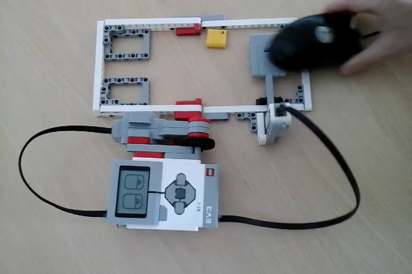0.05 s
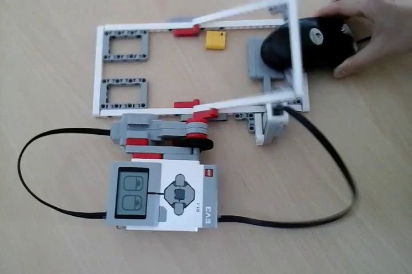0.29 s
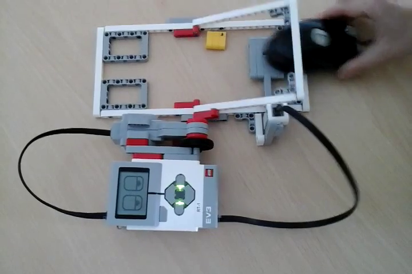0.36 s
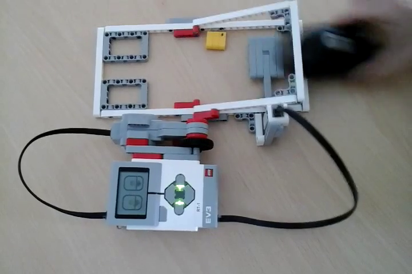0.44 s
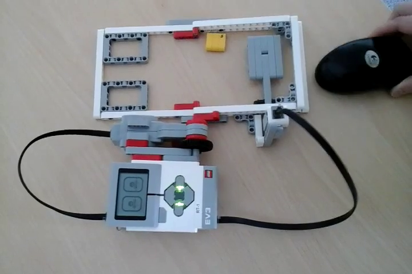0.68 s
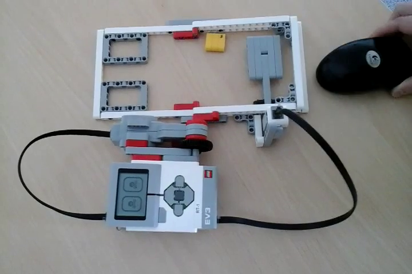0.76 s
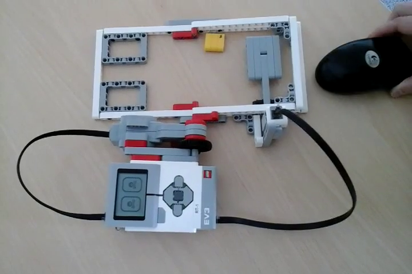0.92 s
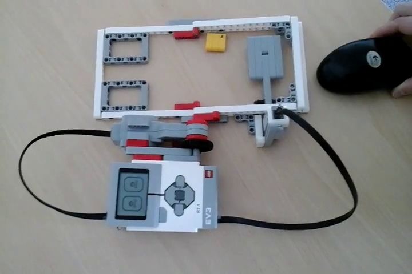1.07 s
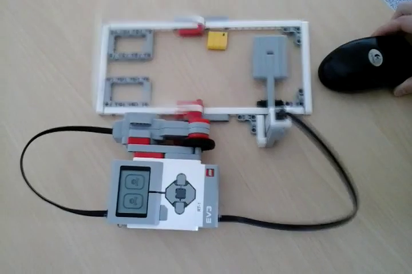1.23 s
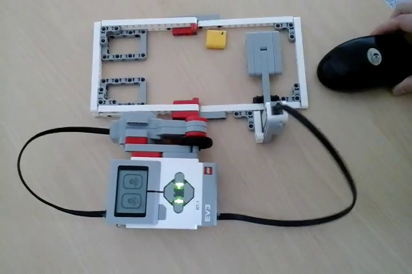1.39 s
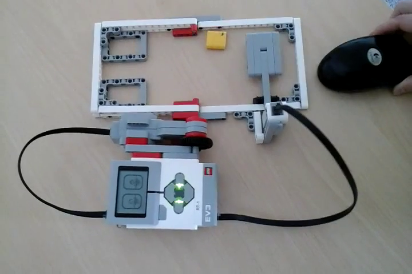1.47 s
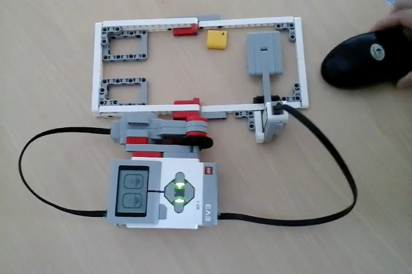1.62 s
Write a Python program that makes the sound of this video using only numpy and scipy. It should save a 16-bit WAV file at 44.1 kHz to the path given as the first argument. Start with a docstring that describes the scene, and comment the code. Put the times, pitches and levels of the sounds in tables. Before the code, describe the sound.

Two sharp plastic snaps with brief rattles, as a small geared motor whirs in spurts.

```python
"""Toy brick trap on a table

A small geared motor twice swings a plastic arm over; it slaps its frame, bounces and rattles. In between,
the motor winds back in three short spurts and the bait, a computer mouse, is dragged over the table.
A bare room, a close pair of microphones: the right one rings near 5 kHz, and the slaps overload them."""
import sys
import numpy as np
from scipy import signal
from scipy.fft import rfft, irfft
from scipy.io import wavfile
from scipy.ndimage import uniform_filter1d

SR = 44100
rng = np.random.default_rng(int(sys.argv[2]) if len(sys.argv) > 2 else 0)


def master(y):
    """Save y as 16-bit WAV."""
    cut = np.clip(np.atleast_2d(y).T, -1, 1)
    pcm = np.round(cut * 32767)  # scale
    wavfile.write(sys.argv[1], SR, pcm.astype(np.int16))


N = 74970
T = np.arange(N) / SR
HZ = np.maximum(np.fft.rfftfreq(2 * N, 1 / SR), 1)

# the arm's slaps and bounces; clicks of the trigger and of gears taking up slack
# (time [s], level [dB], body relative to that level [dB], contact ring [Hz])
ARM_SLAPS = [(.2582, 2.5, 1.5, 4960), (.2632, -1.5, 4.5, 5600), (.268, 2, -7.5, 4770),
             (.2715, -1.5, -8, 4900), (.284, -4.5, -2, 5050), (.2875, -11.5, 8, 5200),
             (.296, -12, -24, 5340), (.3132, -4.5, -9, 5350), (.3157, -5.5, -9.5, 5250),
             (.3445, -14.5, -5, 5140), (1.2898, 4, -11.5, 5480), (1.2932, 4.5, -1.5, 5350),
             (1.298, 4.5, -10, 5430), (1.304, -1.5, -13, 5470), (1.308, -8, -16, 5570),
             (1.3118, -8, -8, 5800), (1.3145, -6, -12, 5430), (1.3205, -8, -2.5, 5240),
             (1.3345, -7.5, -16, 5200), (1.383, -9, -4.5, 5600), (1.3865, -12.5, -0.5, 5400)]
SLACK_CLICKS = [(.0395, -31, 4, 4730), (.0425, -39.5, 8.5, 5400), (.087, -38.5, -5, 5260),
                (.5182, -15.5, -12, 5160), (.5215, -15.5, -1, 5230), (.597, -26, 2, 5400),
                (1.081, -34.5, -12, 5570)]
# modes of the frame (frequency [Hz], level [dB], t60 [s])
FRAME_MODES = [(474, 1, 0.039), (849, 1, 0.15), (968, -2.5, 0.054), (1280, -2.5, 0.11), (1813, -1, 0.045),
               (2279, 3.5, 0.076), (2483, -5.5, 0.078), (2677, 2, 0.07), (3008, -5, 0.079),
               (3780, -1, 0.074), (4576, 3, .08)]
# the table's low modes, rocking the microphones against each other
# (frequency [Hz], level [dB], t60 [s], rocking [0-1])
TABLE_MODES = [(33.8, -18, 0.018, 0.74), (106.6, -8, 0.19, 0.45), (222, -3, 0.1, 0.69),
               (327, -12, 0.019, 0.8)]
# spectra of the table's knock and the plastic's crack (frequency [Hz], level [dB])
KNOCK_SPECTRUM = [(30, -60), (100, -22), (260, 2.5), (600, -1.5), (1000, 1), (2500, -2), (4000, 3.5),
                  (8000, -12.5), (16000, -3.5)]
CRACK_SPECTRUM = [(100, -16), (1000, -11.5), (2500, -1.5), (4500, -2.5), (7000, -9.5), (10000, 4),
                  (14000, -12.5), (16000, -7)]
# gear loudness, swinging and winding back, one curve per run (time [s], level [dB])
SWING_RUNS = [
    [(.098, -37), (.108, -31), (.131, -27), (.156, -23.5), (.198, -27), (.222, -17), (.243, -22.5),
     (.257, -18.5)],
    [(1.08, -38.5), (1.104, -35), (1.11, -25.5), (1.138, -22), (1.17, -25.5), (1.198, -31), (1.24, -27),
     (1.256, -22.5), (1.288, -29)],
]
REWIND_RUNS = [
    [(.52, -21), (.533, -20), (.565, -18), (.575, -23.5), (.579, -14), (.586, -18.5), (.606, -19),
     (.622, -37)],
    [(.724, -27), (.7325, -18.5), (.75, -18.5), (.768, -18), (.782, -21), (.8, -32)],
    [(.935, -44), (.972, -37), (.985, -24.5), (1.002, -27), (1.022, -34), (1.036, -47)],
]
# the gearbox's colour in each direction (frequency [Hz], level [dB])
SWING_SPECTRUM = [(100, -30), (300, -10.5), (600, -29), (1400, -20), (2300, -16), (3100, -3), (4000, -7),
                  (5000, -3.5), (5900, -7), (7200, -19), (10000, -14.5), (15000, -27.5)]
REWIND_SPECTRUM = [(100, -28), (400, -19), (650, -23.5), (1250, -6.5), (2100, -18.5), (2900, -11.5),
                   (3700, -11), (4750, -4), (5600, -9.5), (7200, -22), (10000, -12.5), (15000, -34)]
# its two resonances shift with the load, one row per run
# (upper frequency [Hz], upper level [dB], lower frequency [Hz], lower width [Hz], lower level [dB])
SWING_RESONANCES = [(5030, 13, 3000, 620, -1), (5300, 8.5, 3270, 240, 4)]
REWIND_RESONANCES = [(4660, 13.4, 2800, 330, 3), (4730, 15.8, 2980, 460, 9.9), (4890, 14, 2720, 120, 20.3)]
# motor whine during the second swing (time [s], level [dB])
WHINE_LEVELS = [(1.115, -86), (1.135, -72), (1.165, -42), (1.19, -68), (1.225, -48), (1.265, -48),
                (1.285, -60)]
# the bait sliding over the table (time [s], level [dB])
DRAG_LEVELS = [(.49, -45), (.535, -32.5), (.62, -34), (.68, -38), (.74, -42), (.8, -43)]
# spectra of that sliding, the room's echo and the room tone (frequency [Hz], level [dB])
DRAG_SPECTRUM = [(50, -16), (150, -0.5), (480, 5), (900, -14), (1450, 3), (2000, -5), (4000, -7),
                 (10000, -65)]
ECHO_SPECTRUM = [(40, -19), (150, -4), (500, -2.5), (1500, -2), (2500, -3.5), (5000, -4), (8000, -6),
                 (14000, -7)]
ROOM_TONE_SPECTRUM = [(25, -16), (90, -13), (180, -4), (450, -8.5), (1500, -13.5), (5300, -29.5),
                      (9000, -30), (14000, -33)]
# the room's decay, held to at least 1 ms in use (frequency [Hz], t60 [s])
ECHO_DECAY = [(100, 0.35), (300, 0.93), (800, 0.86), (1800, 1.35), (5000, 0.89), (8000, 0.5),
              (14000, -0.17)]
# response of each microphone, and of what the two have in common (frequency [Hz], gain [dB])
LEFT_RESPONSE = [(100, 1), (1100, 3), (2300, -1), (3500, -2.5), (5000, -5), (7000, 4), (10000, -3.5),
                 (15000, -4)]
RIGHT_RESPONSE = [(100, 2), (1100, -0.5), (2300, 4), (4000, -1), (4900, 6), (6000, 7), (7500, 6),
                  (15000, -22)]
MID_RESPONSE = [(30, 1), (70, -5.5), (140, -9), (300, -11), (600, -3.5), (1200, -1.5), (15000, 1.5)]

FRAME_DB, KNOCK_DB, CRACK_DB, RING_DB, TICK_DB, THUD_DB = -21, -5, -3, -3.5, 1, -25
KNOCK_T60_S, CRACK_T60_S, RING_T60_S, TICK_T60_S = .043, .024, .02, .0084
SOFT_DULLING = .64  # extra dB of crack lost per dB of weaker contact
TOOTH_JITTER, TOOTH_SCATTER_DB, TOOTH_SCRAPE_S = .2, 1.5, .003
RUB_DB, SHAFT_HZ, SHAFT_DB = -2, 120, 1


def strikes(contacts, frame_modes):
    """Each contact cracks, rings the struck brick and any frame modes, and knocks and shakes the table."""
    out = np.zeros((2, N))
    knock, crack = noise(KNOCK_SPECTRUM), noise(CRACK_SPECTRUM)
    thud = sum(undb(level) * np.sin(2 * np.pi * hz * T) * fade(T, t60) * np.array([[1], [1 - 2 * rock]])
               for hz, level, t60, rock in TABLE_MODES)
    for start, db, body_db, ring_hz in contacts:
        first = int(start * SR)
        t = T[:min(N - first, N // 5)]
        span = slice(first, first + len(t))
        ring = unit(resonate(rng.standard_normal((2, N // 5)), ring_hz, width_hz=880))[:, :len(t)]
        phases = rng.uniform(0, 2 * np.pi, (len(frame_modes), 2, 1))
        detunes = 1 + .002 * rng.standard_normal(len(frame_modes))
        frame = sum(undb(level) * np.sin(2 * np.pi * hz * detune * t + phase) * fade(t, t60)
                    for (hz, level, t60), phase, detune in zip(frame_modes, phases, detunes))
        body = undb(FRAME_DB) * frame + undb(KNOCK_DB) * knock[:, span] * fade(t, KNOCK_T60_S)
        edge = undb(CRACK_DB + SOFT_DULLING * db) * crack[:, span] * fade(t, CRACK_T60_S)
        edge += undb(RING_DB) * ring * fade(t, RING_T60_S)
        edge *= 1 + undb(TICK_DB) * fade(t, TICK_T60_S)  # the first instant stands out
        out[:, span] += undb(db) * (edge + undb(body_db) * body + undb(THUD_DB) * thud[:, :len(t)])
    return out


def gears(runs, resonances, spectrum, teeth_hz, db):
    """Plastic teeth scrape in an uneven train and ring the gearbox: (close up, sent to the room)."""
    timing, force = rng.standard_normal((N // 40, 2)).T
    onsets = ((np.arange(len(timing)) + TOOTH_JITTER * timing) / teeth_hz * SR).astype(int)
    inside = (onsets >= 0) & (onsets < N)
    teeth = np.bincount(onsets[inside], undb(TOOTH_SCATTER_DB * np.clip(force[inside], -2, 2)), N)
    pressure = unit(np.convolve(teeth, np.hanning(int(TOOTH_SCRAPE_S * SR)), "same")) + undb(RUB_DB)
    shaft_swell = undb(SHAFT_DB * np.sin(2 * np.pi * SHAFT_HZ * T))
    scrape = pressure * rng.standard_normal((2, N)) * shaft_swell
    scrape = scrape + undb(-15.5) * scrape[::-1]  # spill between the microphones
    rattle = colour(scrape, spectrum)
    near = far = 0
    for run, (upper_hz, upper_db, lower_hz, lower_width_hz, lower_db) in zip(runs, resonances):
        upper = undb(upper_db) * resonate(rattle, upper_hz, width_hz=320)
        lower = undb(lower_db) * resonate(rattle, lower_hz, lower_width_hz)
        ringing = (upper + lower) / 2
        gain = swell(run) * undb(db) / np.std(rattle + ringing)
        near += gain * (rattle + ringing)
        far += gain * (rattle + undb(-32) * ringing)  # little of the ring reaches the room
    return np.array([near, far])


def motor_whine(pitch_hz=1835, wobble_hz=14):
    """A thin, slightly unsteady tone from the motor at full speed."""
    hz = pitch_hz + wobble_hz * unit(uniform_filter1d(rng.standard_normal(N), size=400))
    return np.sin(2 * np.pi * np.cumsum(hz) / SR) * swell(WHINE_LEVELS)


def bait_drag():
    """The bait rubs over the tabletop with a brief, dull hiss."""
    return noise(DRAG_SPECTRUM) * swell(DRAG_LEVELS)


def room_echo(x, build_s=.008):
    """The bare room's diffuse echo builds up and dies away, the top octaves first."""
    octaves_hz = 62.5 * 2 ** np.arange(9)
    spectrum = rfft(rng.standard_normal((2, N)), 2 * N)
    tail = 0
    for hz, share in zip(octaves_hz, np.eye(len(octaves_hz))):
        envelope = fade(T, along(ECHO_DECAY, hz)) * (1 - np.exp(-T / build_s))
        band = irfft(spectrum * np.interp(np.log(HZ), np.log(octaves_hz), share))[:, :N]
        tail += band * envelope / np.sqrt(np.sum(envelope ** 2))
    return signal.fftconvolve(x, colour(tail, ECHO_SPECTRUM), axes=1)[:, :N]


def room_tone():
    """Faint, steady noise behind everything."""
    return undb(-50) * noise(ROOM_TONE_SPECTRUM)


def undb(db):
    """Decibels to gain."""
    return 10 ** (np.asarray(db) / 20)


def unit(x):
    """Scale to an rms of one."""
    return x / np.sqrt(np.mean(x ** 2))


def along(points, hz):
    """Read a table on a log-frequency axis."""
    frequencies, values = np.array(points).T
    return np.interp(np.log(hz), np.log(frequencies), values)


def colour(x, points):
    """Minimum-phase filter through the points (frequency [Hz], gain [dB])."""
    cepstrum = irfft(np.log(undb(along(points, HZ))))
    cepstrum[1:N] *= 2
    cepstrum[N + 1:] = 0
    return irfft(rfft(x, 2 * N) * np.exp(rfft(cepstrum)))[..., :N]


def noise(points):
    """Coloured noise, different at the two microphones."""
    return unit(colour(rng.standard_normal((2, N)), points))


def resonate(x, hz, width_hz):
    """One resonance, gain 1 at its centre."""
    return signal.lfilter(*signal.iirpeak(hz, hz / width_hz, fs=SR), x)


def fade(t, t60):
    """Exponential decay by 60 dB in t60 seconds, 1 ms at the shortest."""
    return np.exp(-np.log(1000) * t / max(t60, .001))


def swell(points):
    """Gain along a curve (time [s], level [dB]), silent outside it."""
    return undb(np.interp(T, *np.array(points).T, left=-np.inf, right=-np.inf))


def pan(db):
    """Gains of the pair for a level difference, left minus right."""
    return undb(np.array([[db], [-db]]) / 2)


def scene():
    """The trap close by and to the right, the bait on the table, the room around them."""
    slaps = strikes(ARM_SLAPS, FRAME_MODES)
    clicks = strikes(SLACK_CLICKS, frame_modes=[])
    swings = gears(SWING_RUNS, SWING_RESONANCES, SWING_SPECTRUM, teeth_hz=500.3, db=-5) + motor_whine()
    rewinds = gears(REWIND_RUNS, REWIND_RESONANCES, REWIND_SPECTRUM, teeth_hz=355.2, db=-5.5)
    motor_near, motor_far = swings + rewinds
    echo = room_echo(undb(-6.5) * slaps + motor_far + clicks)
    direct = slaps * pan(db=-4.5) + clicks * pan(db=-7) + motor_near * pan(db=-6.5)
    return direct + bait_drag() + echo + room_tone()


def record(dry):
    """Two unlike microphones, moving against each other in the low mids and overloading on the peaks."""
    mid = colour((dry[0] + dry[1]) / 2, MID_RESPONSE)
    side = (dry[0] - dry[1]) / 2
    pair = np.array([colour(mid + side, LEFT_RESPONSE), colour(mid - side, RIGHT_RESPONSE)])
    ceiling, top_hz = .84, 14900
    overloaded = ceiling * np.tanh(pair / ceiling)
    steep_lowpass = signal.ellip(8, .2, 60, top_hz, fs=SR, output="sos")
    return signal.sosfilt(steep_lowpass, overloaded)


dry = scene()
out = record(dry)
master(out)
```